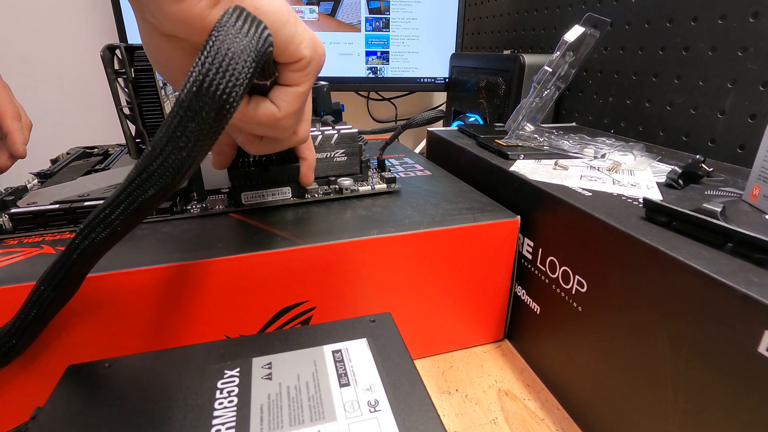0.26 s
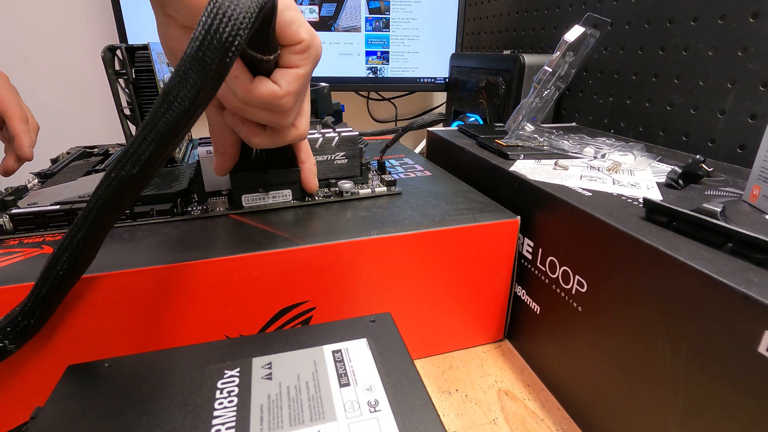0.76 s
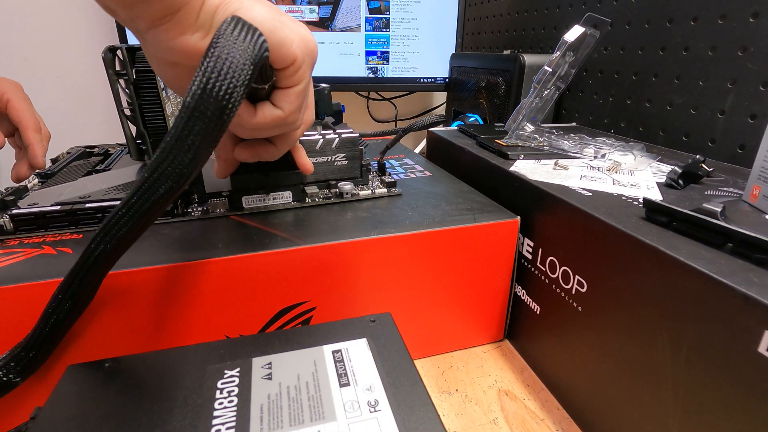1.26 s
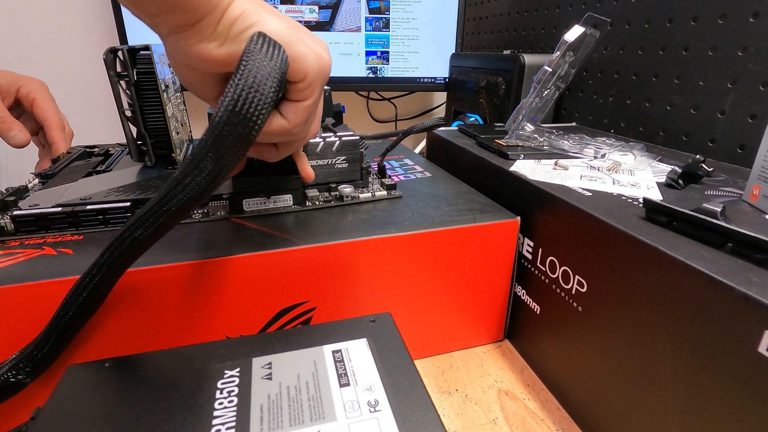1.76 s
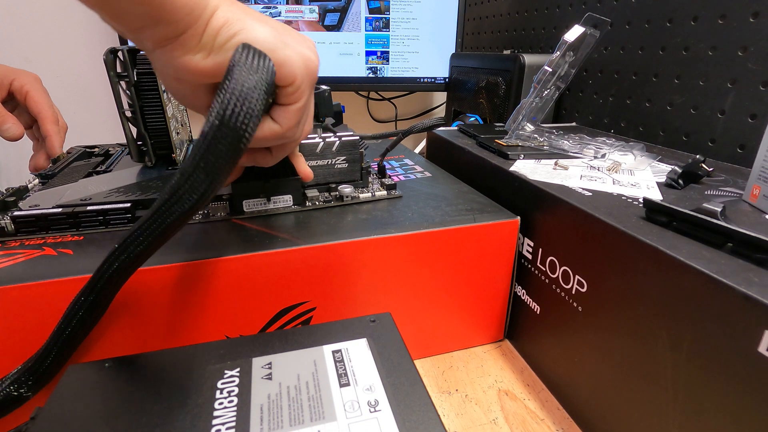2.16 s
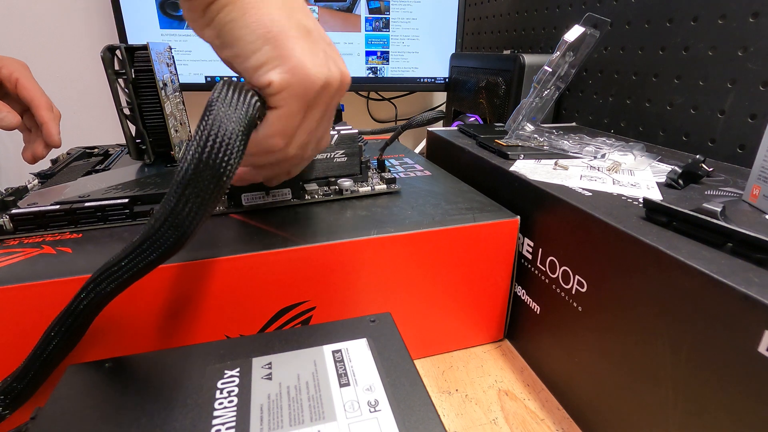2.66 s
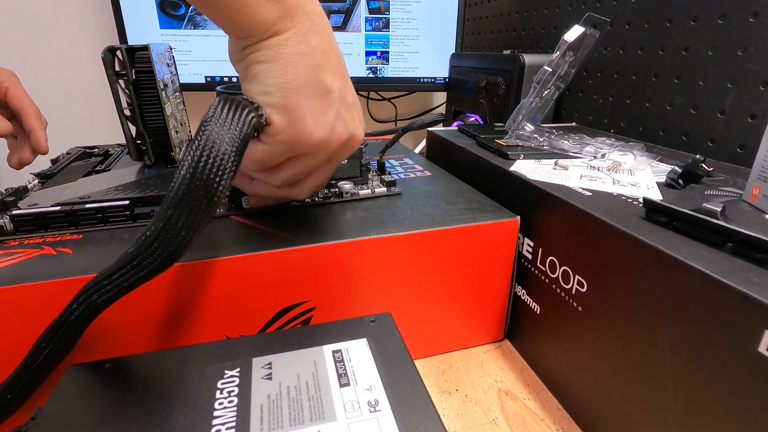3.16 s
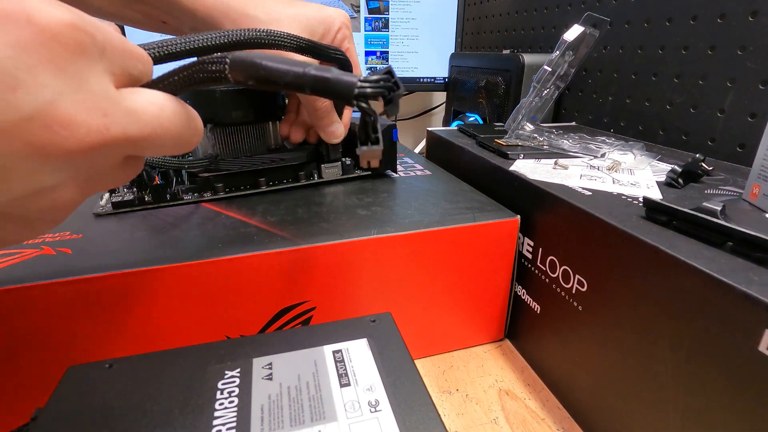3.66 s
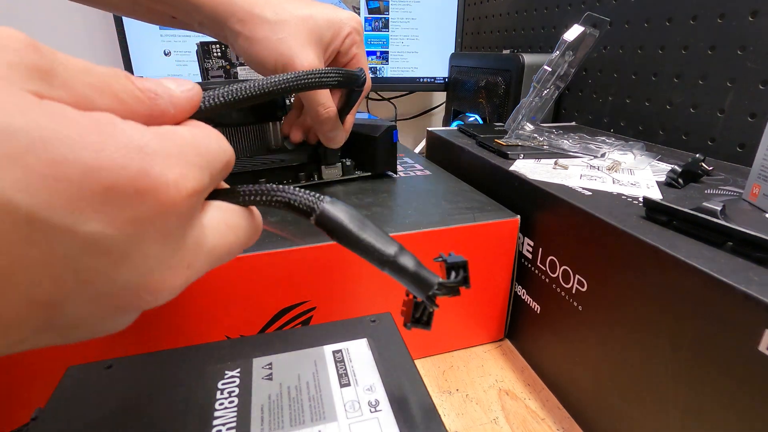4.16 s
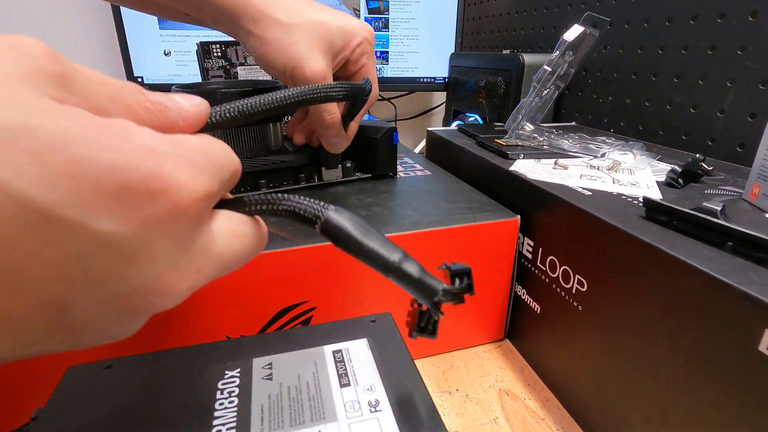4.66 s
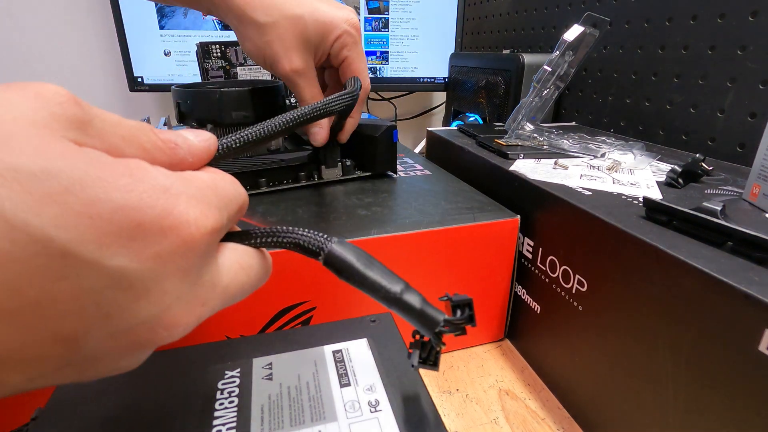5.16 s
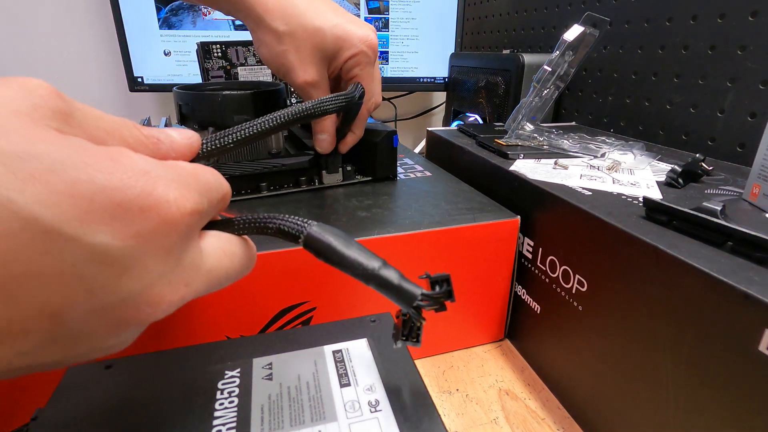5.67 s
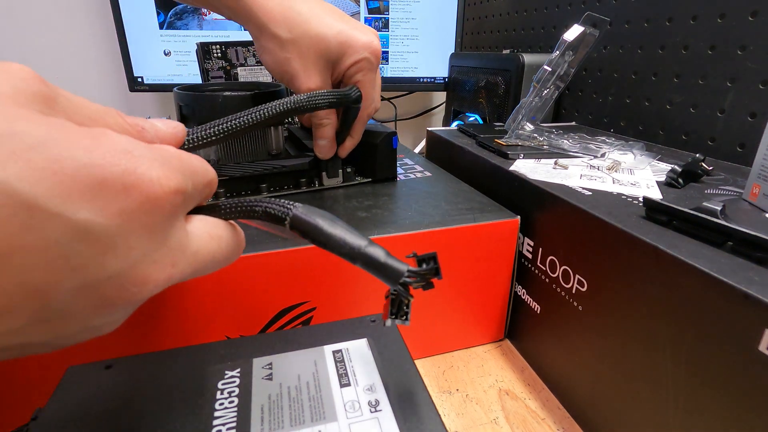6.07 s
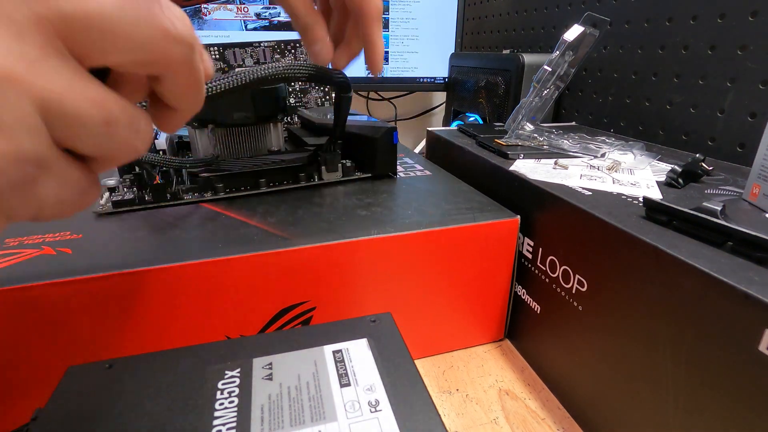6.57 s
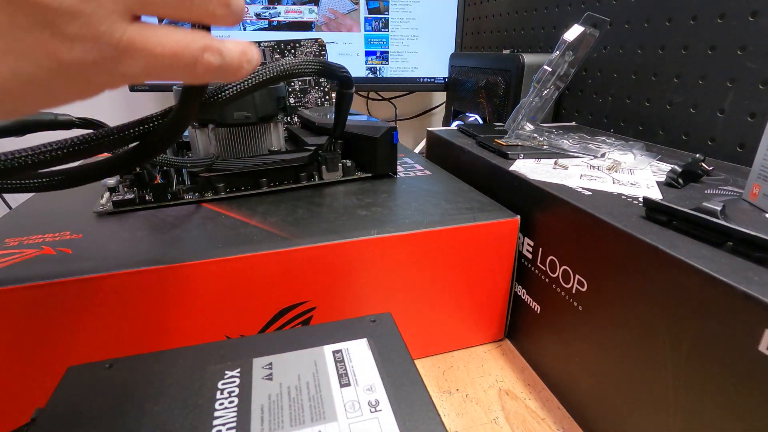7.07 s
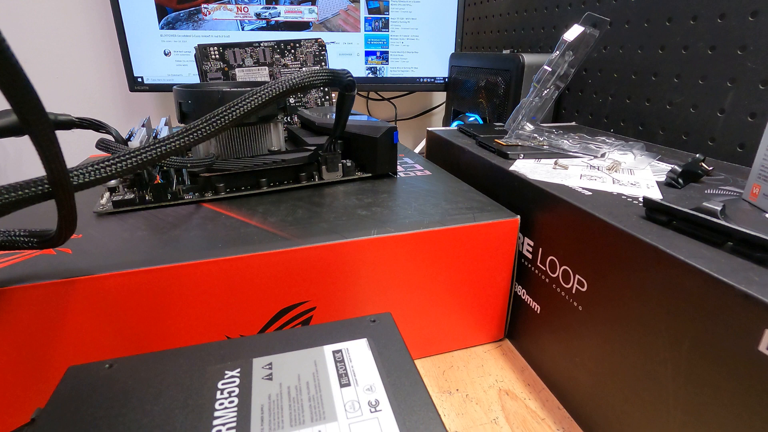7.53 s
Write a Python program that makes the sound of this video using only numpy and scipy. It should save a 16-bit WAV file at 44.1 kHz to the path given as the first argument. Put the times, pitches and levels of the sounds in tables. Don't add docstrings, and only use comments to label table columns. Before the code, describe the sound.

A quiet indoor workbench with a very soft fan whisper. Low desk thuds accompany sharp plastic latch clicks, tiny pin ticks, braided cable scrapes and faint rubbing tones. Long calm gaps separate three main snaps; the last is loudest, with a short cable shudder, then light ticks and a small low creak.

```python
import sys
import numpy as np
from scipy import signal
from scipy.fft import rfft, irfft
from scipy.io import wavfile
from scipy.ndimage import uniform_filter1d

SR = 44100
rng = np.random.default_rng(int(sys.argv[2]) if len(sys.argv) > 2 else 0)


def bounce(signal):
    frames = np.transpose(np.atleast_2d(signal))
    limited = np.clip(frames, -1, 1)
    pcm = np.round(limited * 32767).astype(np.int16)
    wavfile.write(sys.argv[1], SR, pcm)


def invert_db(level):
    return 10 ** (np.asarray(level, dtype=float) / 20)


N = 343980
T = np.arange(N) / SR


def unit(x):
    return x / np.sqrt(np.mean(x ** 2))


def peak(x):
    return x / np.abs(x).max()


def band(x, hz, width):
    return signal.lfilter(*signal.iirpeak(hz, hz / width, SR), x)


def dull(x, hz):
    return signal.lfilter(*signal.butter(2, hz, fs=SR), x)


def fade(t, t60):
    return np.exp(-np.log(1000) * t / t60)


def ring(t, hz, t60):
    return np.sin(2 * np.pi * hz * t) * fade(t, t60)


def swell(start, rise, hold, fall):
    return np.interp(T, np.cumsum([start, rise, hold, fall]), np.array([0, 1, 1, 0]))


def add(out, s, x):
    i = int(s * SR)
    out[i:i + len(x)] += x[:N - i]


def shaped(points):
    hz, db = np.transpose(points)
    f = np.maximum(np.fft.rfftfreq(N, 1 / SR), 1)
    gain = invert_db(np.interp(np.log(f), np.log(hz), db))
    return unit(irfft(rfft(rng.standard_normal(N)) * gain, N))


def walk(rate):
    k = int(SR / rate)
    steps = np.repeat(rng.standard_normal(N // k + 1), k)
    return 1.5 * uniform_filter1d(uniform_filter1d(steps, k), k)[:N]


def grit(size, per_s, spread_db):
    hit = rng.random(size) < per_s / SR
    return unit(hit * rng.standard_normal(size) * invert_db(spread_db * rng.exponential(size=size)) + 1e-9)


# [f/Hz, level/dB per Hz]
FAN_AIR = [(71, -35), (120, -5.5), (223, -16.5), (303, -12), (430, -9.5), (598, -10.5), (751, -8),
           (1090, -7.5), (2190, -18), (4410, -21.5), (5650, -26), (14900, -30.5), (16500, -36)]
FAN_AIR_DB = -64.5


def fans():
    return shaped(FAN_AIR) * invert_db(FAN_AIR_DB + 0.16 * walk(1.87) + 0.41 * walk(13))


# [f/Hz, level/dB per Hz]
SIDE_HISS = [(120, -24), (200, -2), (1390, -11.5), (1970, -10.5), (9480, -7.5), (15000, -8.5), (16500, -26)]
SIDE_HISS_DB = -84


def side_sound(mono, sharp):
    late_body = np.roll(band(mono, 740, 800), 300)
    late_treble = np.roll(band(sharp, 7900, 11000), 40)
    return shaped(SIDE_HISS) * invert_db(SIDE_HISS_DB) + invert_db(-38) * late_body + invert_db(-22) * late_treble


# [f/Hz, t60/s, level/dB]
ROOM_BANDS = [(151, 0.26, -6), (513, 0.24, 11.5), (1200, 0.15, 2), (2300, 0.34, -9), (4060, 0.65, -15.5),
              (6530, 0.2, -5), (10900, 0.17, -14)]


def room(x):
    t = T[:SR // 2]
    noise = rng.standard_normal(len(t)) * (1 - np.exp(-t / 0.0027))
    tail = sum(invert_db(db) * band(noise, hz, 0.76 * hz) * fade(t, t60) for hz, t60, db in ROOM_BANDS)
    return signal.fftconvolve(x, tail)[:N] * invert_db(-34.5)


def after(t60, column_db):
    marks = np.zeros(N)
    for row, db in zip(SEATINGS + NUDGES, column_db):
        add(marks, row[0], invert_db([db]))
    return signal.lfilter([1], [1, -fade(1 / SR, t60)], marks)


# [t/s, level/dB]
ARM_WEIGHT = [(0.0, -59), (0.3, -55), (0.41, -57), (1.61, -55), (1.97, -52), (2.17, -57.5), (2.35, -53),
              (4.58, -61), (4.86, -49.5), (5.15, -57), (5.76, -58.5), (6.32, -55), (6.69, -58.5),
              (7.13, -57), (7.28, -56.5), (7.8, -60.5)]
SWAY_AFTER_DB, SWAY_T60_S = -29.5, 1.94
RUMBLE_AFTER_DB, RUMBLE_T60_S = -21.5, 0.22
HUM_AFTER_DB, HUM_T60_S = -26.5, 0.26


def lean():
    s, db = np.transpose(ARM_WEIGHT)
    weight = invert_db(np.interp(T, s, db))
    _, push_db, _, box_db, _ = np.transpose(SEATINGS + NUDGES)
    push = rng.standard_normal((3, N))
    sway = unit(band(band(push[0], 18, 21), 22.8, 22))
    rumble = unit(band(band(push[1], 68.5, 50) + 0.21 * band(push[1], 118.0, 40), 81, 142))
    hum = unit(band(band(push[2], 288.9, 21), 324.5, 54))
    sway *= invert_db(-5) * weight + invert_db(SWAY_AFTER_DB) * after(SWAY_T60_S, push_db)
    rumble *= invert_db(-6) * weight + invert_db(RUMBLE_AFTER_DB) * after(RUMBLE_T60_S, push_db)
    hum *= invert_db(-16.5) * weight + invert_db(HUM_AFTER_DB) * after(HUM_T60_S, push_db + box_db)
    return sway + invert_db(2.33 * walk(16)) * rumble + invert_db(3.4 * walk(8.9)) * hum


CREAK_S, CREAK_LENGTH_S, CREAK_EDGE_S, CREAK_DB = 7.28, 0.22, 0.049, -51
CREAK_HZ, CREAK_GLIDE_HZ_PER_S = 84, 100


def creak():
    hz = CREAK_HZ + CREAK_GLIDE_HZ_PER_S * (T - CREAK_S)
    phase = 2 * np.pi * np.cumsum(hz * (1 + 0.0282 * walk(40))) / SR
    tone = np.sin(phase) + 0.32 * np.sin(2 * phase) + 0.17 * np.sin(3 * phase)
    grip = swell(CREAK_S, CREAK_EDGE_S, CREAK_LENGTH_S - 2 * CREAK_EDGE_S, CREAK_EDGE_S)
    return invert_db(CREAK_DB) * grip * invert_db(1.3 * walk(25)) * tone


# [start t/s, length/s, level/dB, f/Hz]
RUBBINGS = [(1.563, 0.1, -61.5, 704), (1.645, 0.033, -63, 684), (1.773, 0.044, -57, 707),
            (1.9, 0.054, -56, 703), (1.98, .035, -59, 727), (0.579, 0.12, -60, 281),
            (0.615, 0.11, -64, 180), (0.984, 0.053, -65.5, 430), (1.072, 0.062, -64.5, 310),
            (1.21, 0.13, -61.5, 300), (6.972, .08, -72.5, 4620), (3.544, 0.14, -66.5, 308),
            (3.9, 0.14, -67.5, 298), (5.748, .3, -76, 285), (2.587, 0.035, -60, 3530),
            (3.444, .04, -71, 3710), (6.455, .02, -73, 6400), (6.557, 0.011, -71, 6300)]
RUB_EDGE_S = 0.01
RUB_WIDTH_HZ, RUB_WIDENS = 65, 0.4


def rub():
    grain = grit(N, 2500, 2.1) * invert_db(2.6 * walk(70))
    out = np.zeros(N)
    for s, length, db, hz in RUBBINGS:
        width = RUB_WIDTH_HZ * (hz / 300) ** RUB_WIDENS
        song = unit(band(band(grain, hz, width), hz, 2.5 * width))
        out += invert_db(db) * swell(s, RUB_EDGE_S, length, 3.2 * RUB_EDGE_S) * song
    return out


# [t/s, level/dB, t60/s]
CABLE_SHUDDERS = [
    (2.105, -64, .3),
    (4.714, -64.5, 0.34),
    (6.16, -43.5, 0.42),
]
# [loudest t/s, length/s, peak level/dB, treble share level/dB, low share level/dB]
CABLE_STROKES = [(0.097, 0.072, -76.5, -23, 19.5), (0.668, 0.11, -57.5, -33, 5.5),
                 (1.373, 0.2, -71.5, -16, 4.5), (2.03, 0.06, -50, -6, -10), (2.61, 0.094, -64, -16, -17),
                 (2.697, 0.073, -68.5, -19, -1), (3.361, 0.078, -71, -25, 14),
                 (4.915, 0.095, -64.5, -24, -4), (5.145, .14, -66, -6.5, 1.5), (6.82, 0.18, -74.5, -5, -5),
                 (6.977, .08, -72, 5, -8), (7.034, .13, -72.5, 9, -8), (7.278, 0.13, -75, 10, -9),
                 (7.693, .1, -80, 5, 1)]
STROKE_RISE_SHARE, STROKE_PEAKING = 0.45, 1.32


def scrape():
    fibres = grit(N, 5000, 1.8) * invert_db(1.3 * walk(90))
    sleeve = band(fibres, 3200, 1300) + 1.2 * band(fibres, 4170, 680) + 0.65 * band(fibres, 2040, 800)
    mid = unit(dull(sleeve, 5100))
    high = unit(dull(band(band(fibres, 6400, 6000), 4900, 8000), 11000))
    low = unit(band(fibres, 716, 110) + band(fibres, 1480, 290) * 0.53 + 1.4 * band(fibres, 310, 150))
    shake = sum(invert_db(db) * (T > s) * fade(abs(T - s), t60) for s, db, t60 in CABLE_SHUDDERS)
    out = shake * (mid + 0.17 * unit(band(fibres, 3760, 600)) + 0.46 * low + 0.16 * high)
    for s, length, db, treble_db, low_db in CABLE_STROKES:
        rise = STROKE_RISE_SHARE * length
        stroke = swell(s - rise, rise, 0, length - rise) ** STROKE_PEAKING
        out += invert_db(db) * stroke * (mid + invert_db(treble_db) * high + invert_db(low_db) * low)
    return out


# [t/s, peak level/dB, f/Hz, box share level/dB, lid share level/dB]
SEATINGS = [(2.013, -25.5, 44.3, -15.5, -14.5), (2.036, -30, 67, -19, -19), (2.016, -41.5, 182, -17, 0),
            (2.05, -34, 42, -23, -21), (2.093, -40, 107.5, -4, -5), (2.122, -36, 72, -18, -24),
            (4.719, -29, 45, -17, -31), (4.737, -25.5, 61, -25, -46), (4.7476, -35, 129, -4, -8.5),
            (4.775, -33, 67, -14, -22), (6.147, -22.5, 49.3, -8.5, -22), (6.158, -41, 74.6, 5.5, 1),
            (6.17, -21, 67.2, -51, -18.5), (6.195, -41, 70.4, -7, -7), (6.211, -33.5, 64, -38, -21)]
# [t/s, peak level/dB, f/Hz, box share level/dB, lid share level/dB]
NUDGES = [(0.1, -36.5, 40.4, -23, -22), (0.113, -33, 74.7, -13.5, -30), (0.164, -37.5, 71, -27, -30),
          (0.263, -40, 180, -6, -17), (0.279, -34, 81, -10.5, -16), (0.689, -38.5, 41, -19, -27),
          (0.991, -40.5, 84, -17.5, -16.5), (1.029, -47, 93, -8.5, -18), (1.659, -49.5, 73.5, -27, -3),
          (2.291, -39.5, 40, -18.5, -11.5), (2.498, -54, 55.4, 1.5, -31), (2.769, -46, 86, -18, -20),
          (2.969, -48, 72, -10, -27), (3.349, -40.5, 70.3, -20, -4), (3.521, -39.5, 76.4, -11, -19.5),
          (3.999, -44, 72, -25, -30), (4.096, -38, 68, -31, -37), (5.331, -41, 102.6, -10.5, -14),
          (7.012, -47, 95.5, -11, -26)]
DESK_RING_S = 0.2


def thumps():
    out, t = np.zeros(N), T[:SR // 2]
    t60 = DESK_RING_S
    soft = 1 - np.exp(-t / 0.0061)
    box = soft * (ring(t, 303.5, 0.17) + 0.5 * ring(t, 336, 0.1) + 0.98 * ring(t, 423, 0.027))
    lid = ring(t, 711.0, 0.035) + 0.3 * ring(t, 551, 0.1)
    for s, db, hz, box_db, lid_db in SEATINGS + NUDGES:
        desk = ring(t, hz, t60) + 1.13 * ring(t, 1.75 * hz, 0.37 * t60) + 0.78 * ring(t, 2.6 * hz, 0.2 * t60)
        push = soft * desk + invert_db(box_db + 3.5) * box + invert_db(lid_db + 7.5) * lid
        add(out, s, -invert_db(db) * push)
    return out


# [f/Hz, level/dB, t60/s]
BOARD_TONES = [(2526, -6.5, 0.089), (3020, -36, 0.16), (3070, -8, 0.27), (3820, -4, 0.25),
               (3984, -12, 0.56), (4260, -16, 0.53), (4490, 2, 0.073), (4540, -16, 0.073),
               (4800, -16.5, 0.2), (5400, -23, 0.19), (6340, 0, 0.14), (6900, -31, 0.23)]
TONE_T60_CAP_S = 0.022


def board_tones(t):
    luck = rng.standard_normal((len(BOARD_TONES), 2))
    out = np.zeros(len(t))
    for (hz, db, t60), (louder, higher) in zip(BOARD_TONES, luck):
        tone = ring(t, hz * (1 + 0.0199 * higher), min(0.17 * t60, TONE_T60_CAP_S))
        out += invert_db(db + 2.4 * louder) * tone
    return out


# [t/s, peak level/dB, plastic f/Hz, treble share level/dB, board share level/dB]
LATCH_SNAPS = [(0.2661, -47, 2980, -26, -7), (0.2715, -45.5, 1840, -31, -1.5), (1.828, -51, 5000, 6, -20),
               (1.8392, -35, 4850, -7.5, -31), (2.016, -40, 1950, -33, -27), (2.0348, -33, 4200, -40, -29),
               (2.0953, -26.5, 4470, -7, -43), (2.1033, -35, 4400, -7, -22), (2.097, -56, 13500, -12, -30),
               (2.2888, -46, 1830, -31, -35), (4.707, -32.5, 3330, -36, -1.5),
               (4.7136, -44.5, 2890, -26, -1), (4.7483, -56, 1800, -24, 3), (6.143, -39, 2500, -23, -7),
               (6.1471, -18.5, 2780, -6.5, -31), (6.1503, -19.5, 5400, -18, -22),
               (6.1652, -21.5, 4230, -23, -7), (6.1848, -21.5, 2410, -32, -20),
               (6.204, -37, 4210, -28, -10), (6.1486, -22, 12600, -20, -33), (1.844, -45, 13000, -8, -30)]
# [t/s, peak level/dB, plastic f/Hz, treble share level/dB]
PIN_TICKS = [(0.1078, -47.5, 1800, -23), (0.9887, -52.5, 1840, -24), (1.1018, -45.5, 4080, -22),
             (1.518, -54.5, 1940, -23), (1.5938, -51.5, 1810, -25), (1.6587, -45.5, 1790, -30),
             (1.6876, -53, 2900, -14), (2.5057, -51, 5250, -9), (2.838, -53.5, 3800, -20),
             (3.3493, -48.5, 3840, -30), (3.4411, -55, 3670, -9), (5.3333, -59, 2460, -16),
             (5.9484, -59, 2580, -18), (6.379, -55, 6340, -24), (6.41, -52, 2950, -23),
             (6.4235, -50.5, 2090, -24), (6.4557, -45, 2060, -13), (6.556, -54.5, 3440, -23),
             (6.5687, -49, 6330, -22), (7.2085, -60, 7440, -5), (7.2494, -52, 6500, -25),
             (7.4633, -58, 5000, 3.5)]
TICK_BOARD_DB, RATTLE_S = -22.5, 0.037


def clicks():
    out, t = np.zeros(N), T[:SR // 4]
    for s, db, hz, treble_db, board_db in LATCH_SNAPS + [(*row, TICK_BOARD_DB) for row in PIN_TICKS]:
        blow = grit(len(t), 12000, 2.6) * fade(t, RATTLE_S) * 0.33
        blow[0] += 1.5
        shell = band(blow, hz, 0.32 * hz) + band(blow, 4500, 2700) * 0.32
        shell += 0.02 * signal.fftconvolve(blow, board_tones(t))[:len(t)]
        shell = dull(shell, 0.79 * hz + 2500)
        latch = dull(band(band(blow, 6150, 4300), 9100, 7600), 12600)
        board = band(band(blow, 1275, 480), 1230, 670)
        click = peak(shell) + invert_db(treble_db + 5) * peak(latch) + invert_db(board_db + 2.5) * peak(board)
        add(out, s, invert_db(db) * click)
    return out


def scene():
    sharp = clicks() + scrape()
    mono = fans() + room(sharp) + lean() + creak() + rub() + thumps() + sharp
    side = side_sound(mono, sharp)
    return np.array([mono + side, mono - side])


def band_limit(x):
    return signal.sosfilt(signal.butter(12, 16760, fs=SR, output="sos"), x)


def record(dry):
    top = signal.ellip(6, 0.2, 40, 16000, fs=SR, output="sos")
    mix = signal.sosfilt(top, dry)
    return band_limit(mix)


dry = scene()
out = record(dry)
bounce(out)
```